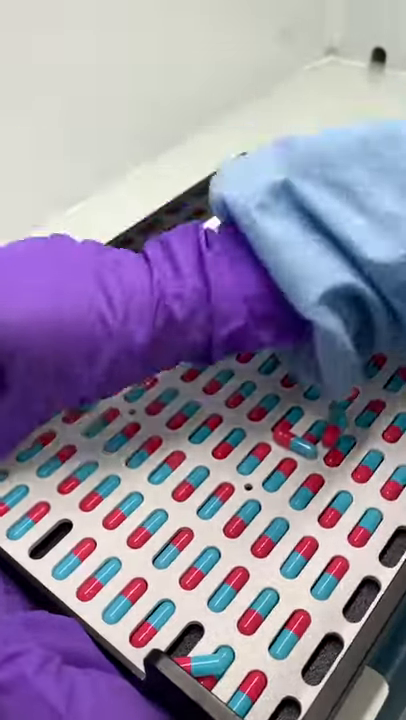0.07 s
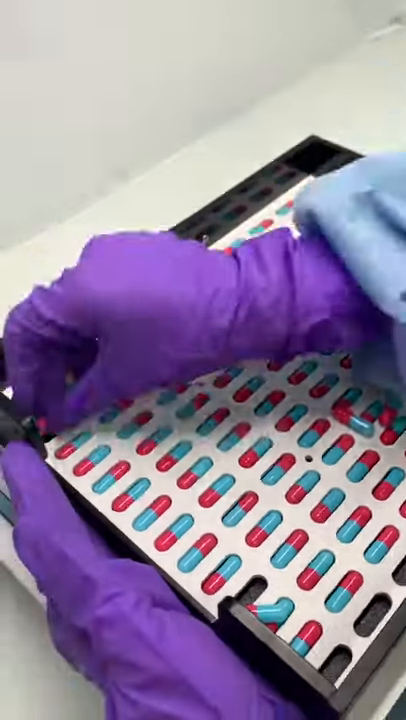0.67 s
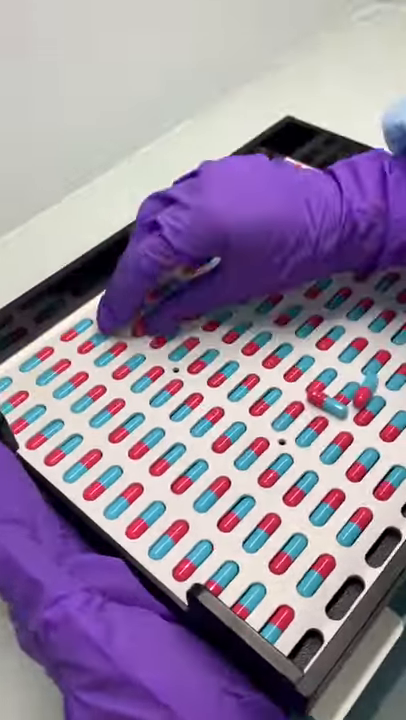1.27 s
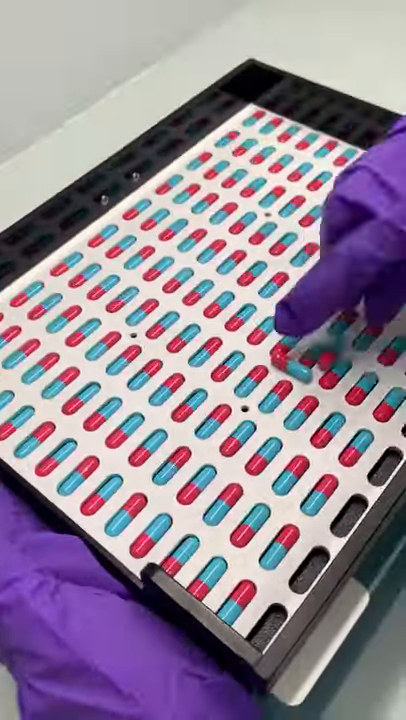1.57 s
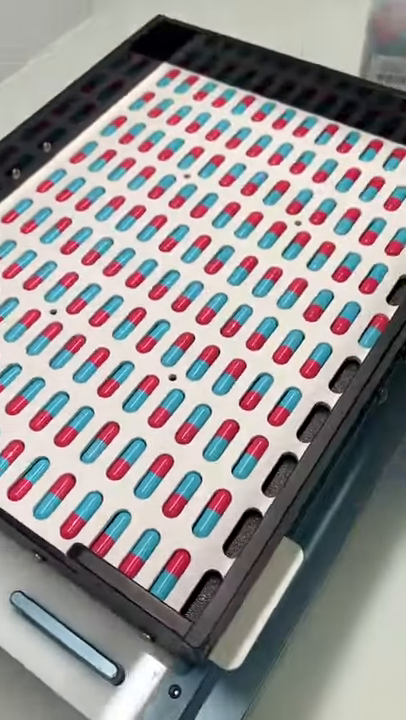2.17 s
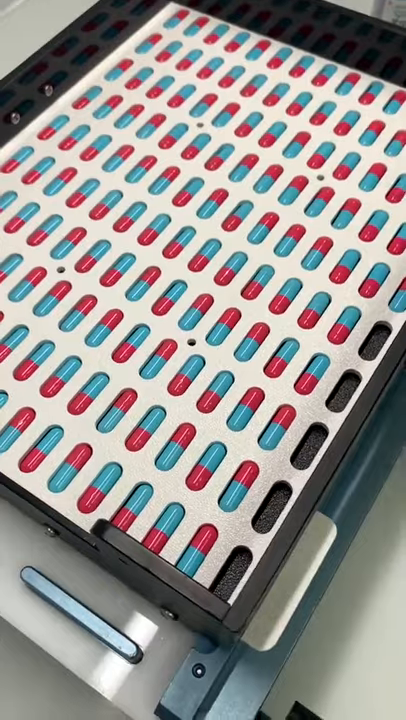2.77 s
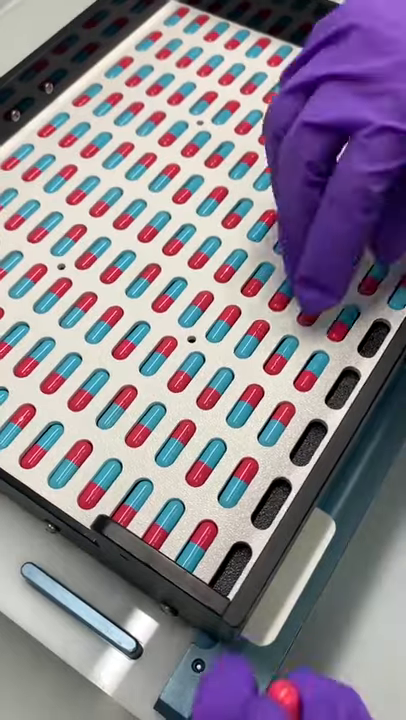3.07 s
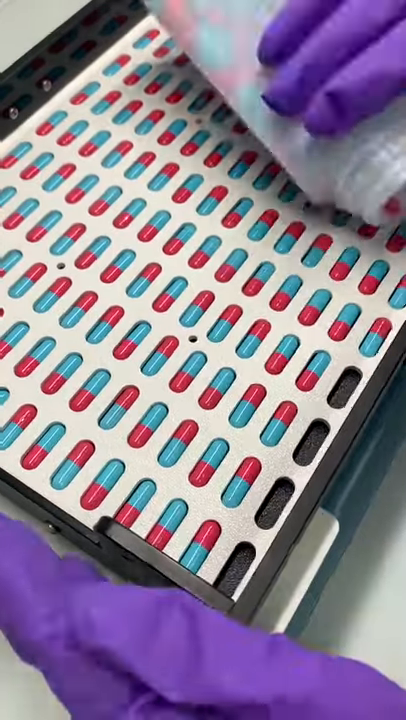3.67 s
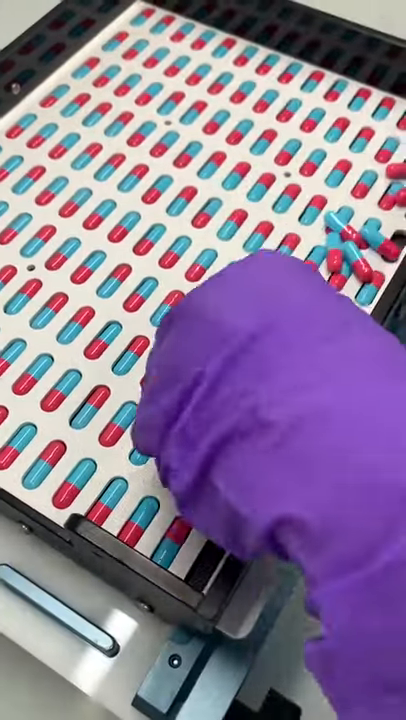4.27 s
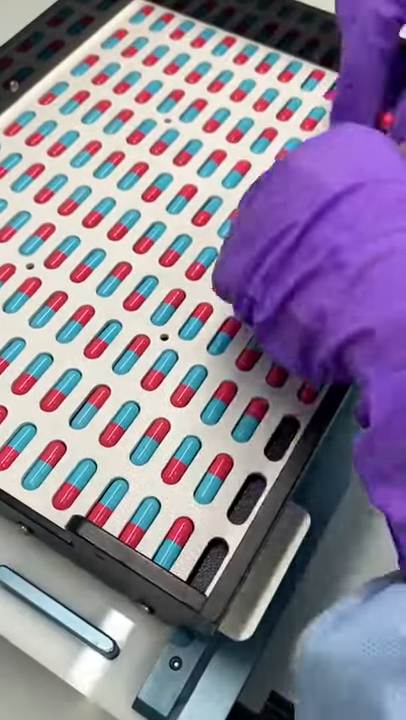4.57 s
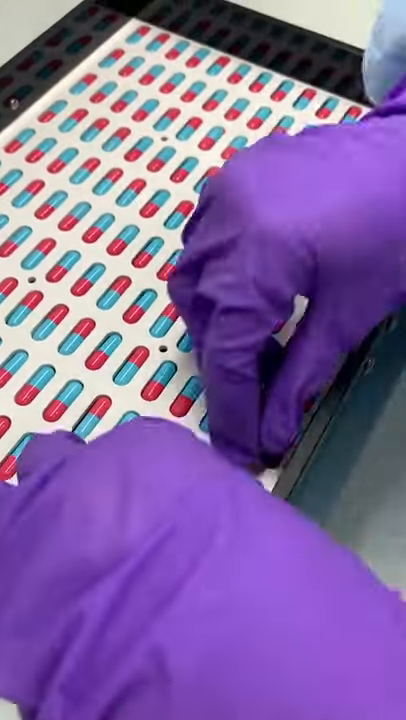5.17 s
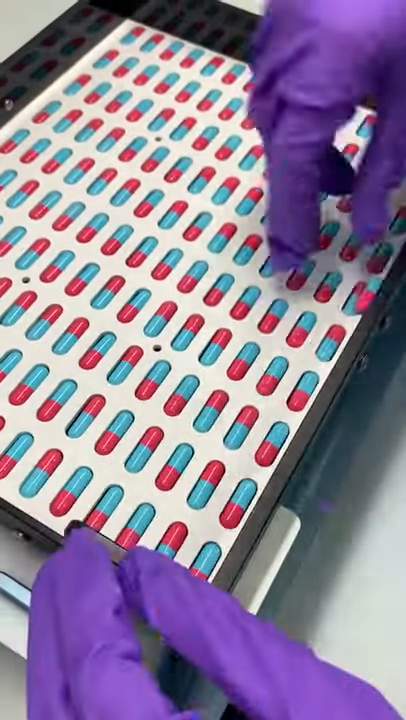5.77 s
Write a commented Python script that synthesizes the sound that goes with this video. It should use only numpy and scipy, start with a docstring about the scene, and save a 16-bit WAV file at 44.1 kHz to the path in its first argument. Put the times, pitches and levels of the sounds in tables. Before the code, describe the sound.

Ventilation hums throughout in a small booth, low and slightly wavering. Close by, gloved hands press hard plastic capsules into a tray: small, irregular clicks inside soft scuffs over the first second and again around 2 seconds. Rubber gloves swish and sleeves rustle faintly in between. The machine's frame gives soft, low thuds near 1 and 2 seconds. After a lull, a few capsules rattle briefly at about 2.8 seconds, followed by more clicks and a thud. From about 3.5 to 4.3 seconds comes the loudest part: a plastic bag crinkles with sharp little cracks as capsules spill in clumps and clatter on the dully ringing tray. Gloves swish at around 4.5 seconds. The pressing then continues, with a busier run of light clicks from 5.2 seconds until the end near 6 seconds, and soft thuds at about 5.3 and 5.7.

```python
"""A capsule-filling booth. Gloved hands press hard plastic capsules into the pockets of a tray:
small clicks inside soft scuffs. Midway more capsules slide out of a crinkling plastic bag and rattle
on the tray, whose plate rings dully. Gloves and sleeves rustle in between, and the machine's frame
thuds under a leaning hand. Behind it all, ventilation air drones in three duct resonances."""
import sys
import numpy as np
from scipy import signal
from scipy.fft import rfft, irfft, next_fast_len
from scipy.io import wavfile
from scipy.ndimage import map_coordinates

SR = 44100
rng = np.random.default_rng(int(sys.argv[2]) if len(sys.argv) > 2 else 0)


def put_to_file(sound):
    """Save the sound as 16-bit audio at rate SR, in the file named by the first command-line argument."""
    columns = np.atleast_2d(sound).T  # one column per channel
    safe = np.clip(columns, -1, 1)
    whole_steps = np.round(safe * 32767)
    wavfile.write(sys.argv[1], SR, whole_steps.astype(np.int16))


N = 261072
TIME_S = np.arange(N) / SR
BURST_S = np.arange(-SR // 10, SR // 5) / SR  # time around one contact

# dull and bright rustle of thin sheets: freq_hz, density_db
DULL_RUSTLE = [(50, 2), (300, 17), (700, 3.5), (1500, 9.5), (2600, 3), (4500, -2), (8000, -7.5),
               (12000, -38), (15500, -45)]
BRIGHT_RUSTLE = [(1000, -10.5), (2500, 5.5), (5000, 1.5), (7500, -0.5), (12000, -4), (15500, -14)]
# balance of close and room sounds: freq_hz, left_minus_right_db
NEAR_PAN = [(500, -2), (1200, -2.5), (2400, -1.1), (4400, 0.3), (15000, -0.15)]
ROOM_PAN = [(60, 2), (130, -2), (220, -3), (310, -6), (420, -1.5), (700, -0.5), (4000, 0)]


def capsule_presses(shell_q=3.6, ripple_db=1.8, cap_hz=7630, cap_width_hz=860, cap_db=-13):
    """Fingers seat capsules: a tick in a scuff, coloured by the damped shell and its small cap."""
    # time_s, click_db, scuff_db, ring_hz, ring_db, tilt_db_per_octave
    presses = [(0.1311, -44, -52.5, 2570, 1, -1), (0.338, -40.5, -59, 1700, 5, 3.5),
               (0.34, -44, -71, 12000, 5, 11), (0.4, -62, -56, 1200, -11, -3.5),
               (0.5395, -38, -49.5, 2760, -15, -1), (0.5472, -51, -57, 2800, -10, -6),
               (0.582, -58, -82, 6370, -1, -6), (0.959, -52, -50.5, 2830, -13, 0),
               (0.967, -56, -47.5, 2560, -4, 2), (0.979, -59, -59, 2800, -8, 1),
               (1.0742, -52, -58, 2600, -17, 1), (1.0803, -47, -51.5, 2600, -17, -1),
               (1.097, -57, -54, 2600, -18, -2), (1.109, -48, -52.5, 2400, -20, -2.5),
               (1.802, -61, -70, 4200, -9, -3), (1.876, -58, -58, 3100, -22, 0),
               (1.9032, -56, -54.5, 3050, -17, -5), (1.945, -65, -61.5, 2800, -3, -6.5),
               (1.998, -44.5, -53.5, 2600, 15, -2), (2.0269, -42.5, -57.5, 4100, -6, -2.5),
               (2.057, -59, -64, 2400, -11, -18), (3.178, -51.5, -55.5, 3000, 1, -12.5),
               (3.286, -45.5, -49.5, 2600, -14, -7.5), (3.399, -59, -53.5, 2280, -10, -1.5),
               (3.447, -53, -56, 4030, -20, -4.5), (4.26, -60, -54, 2930, -4, -2),
               (4.367, -71, -51.5, 4200, -19, -0.5), (4.466, -61, -59, 4200, -13, 0),
               (4.6547, -56, -65, 2430, -16, -3), (4.8597, -54, -52, 5400, -26, 1.5),
               (4.876, -66, -62, 4500, -18, -1), (4.9129, -45.5, -51, 4530, -18, -0.5),
               (5.0889, -68, -54, 3120, -12, -3), (5.1692, -69, -58.5, 4480, -5, -7),
               (5.232, -67, -62.5, 7200, 2, -3.5), (5.261, -51.5, -62, 4650, -17, 3),
               (5.2875, -43, -50.5, 1890, -2, 3), (5.368, -47.5, -53.5, 2580, -20, -1.5),
               (5.416, -47.5, -58, 2780, -5, -4.5), (5.4445, -50, -56, 2760, -14, -3.5),
               (5.4735, -49, -53, 1150, -9, -1.5), (5.497, -61, -64, 2800, -12, -1),
               (5.5201, -65, -53.5, 1150, -7, -1.5), (5.671, -55, -60, 2580, -11, -0.5),
               (5.692, -55, -54.5, 2860, -17, -1), (5.713, -54, -50, 2170, -4, 2),
               (5.744, -39.5, -47.5, 2000, 0, -1), (5.765, -50, -67, 2600, -14, -5.5),
               (5.885, -48, -58, 5160, 3, -2), (5.9039, -50.5, -58.5, 2580, -12, -2)]
    # freq_hz, density_db
    scuff_spectrum = [(80, -23), (300, -2.5), (700, -12.5), (1150, 1.5), (1600, -2.5), (2500, 1),
                      (4000, 0.5), (6000, -1.5), (7700, -2.5), (10000, -6.5), (15500, -14.5)]
    out = np.zeros((2, N))
    envelope = swell(rise_s=0.0076, fade_s=0.01)
    for time_s, click_db, scuff_db, ring_hz, ring_db, slope in presses:
        modes = [(ring_hz, ring_hz / shell_q, ring_db), (cap_hz, cap_width_hz, cap_db)]
        shell = lambda hz: (0.5 + resonances(modes, hz)) * amp(ripple_db * ripple(hz, step_hz=243.6))
        colour = lambda hz: amp(along(scuff_spectrum, hz)) * tilt(slope, hz) * shell(hz)
        press = contact(colour, click_db, scuff_db, envelope, hits_per_s=700, click_s=0.00125)
        add_burst(out, time_s, press)
    return out


def capsule_pour(clatter_db=-4, ripple_db=3.5, knock_octaves=0.44, singles_db=-8):
    """Clumps of capsules clatter on the tray; where they land decides which plate modes ring."""
    # time_s, click_db, rattle_db, knock_db, knock_hz, tilt_db_per_octave, fade_s
    landings = [(2.7485, -49, -47.5, -49, 700, 0.5, 0.0093), (2.8, -50, -49, -71, 700, -2, .009),
                (2.8125, -40, -50, -55, 1080, -.5, 0.026), (2.836, -54, -57, -67, 700, 1, 0.0083),
                (2.8604, -42.5, -55, -56.5, 640, -1.5, 0.026), (3.503, -37.5, -49, -54, 620, -3, 0.021),
                (3.607, -46, -50, -57, 1100, -1.5, .012), (3.621, -42, -43.5, -45, 1170, 0, .02),
                (3.637, -42, -42, -41, 1150, 0, 0.013), (3.644, -27, -54, -42.5, 1140, 4.5, .0085),
                (3.6617, -27, -34, -42.5, 1220, 2, 0.015), (3.67, -40, -44, -42, 1160, 1, 0.01),
                (3.69, -41, -42, -75, 1100, 3, 0.063), (3.7132, -31.5, -40.5, -47, 1580, 1, 0.041),
                (3.7526, -38.5, -50, -63, 705, 6, .015), (3.812, -43, -41, -47.5, 644, 2, 0.056),
                (3.897, -39, -43, -69, 700, 7, 0.011), (3.905, -38, -42.5, -66, 700, 7, 0.087),
                (3.922, -36.5, -42.5, -40, 750, -4.5, 0.027), (3.94, -52, -41, -48.5, 900, -0.5, 0.024),
                (3.972, -43, -43.5, -50.5, 700, 3, 0.049), (4.095, -36.5, -47, -53, 900, -4, 0.018),
                (4.109, -38.5, -40.5, -52, 650, -0.5, 0.026), (4.147, -47, -43, -50.5, 620, -0.5, 0.012),
                (4.201, -42, -54, -56, 630, -3, .006), (4.2066, -37, -50, -45, 645, -4.5, 0.0055),
                (4.2276, -46, -55, -67, 700, -8, 0.0055), (4.3, -52, -52, -59, 590, -1.5, 0.0062)]
    # low and high tray modes: centre_hz, width_hz, gain_db
    plate_modes = [(424, 32, 19.5), (558, 27, 14), (664, 77, 7.5), (707, 44, 10.5), (884, 130, -4.5),
                   (956, 84, -2), (1120, 35, 8), (1216, 60, 6), (1540, 70, 4), (1760, 40, -3)]
    clatter_modes = [(1057, 25, -3), (1260, 23, -18), (1545, 37, -7), (1690, 18, -2), (2710, 200, -1.5),
                     (4240, 610, 0), (5340, 76, -4), (5880, 170, 0)]
    # freq_hz, density_db
    rattle_spectrum = [(60, -10), (250, -4.5), (600, 2.5), (1200, 3), (2000, 3), (3300, -1), (6300, -1.5),
                       (9000, -7), (12000, -9.5), (15500, -20.5)]
    clatter = lambda hz: 1 + amp(clatter_db) * resonances(clatter_modes, hz)
    tray = lambda hz: clatter(hz) * amp(ripple_db * ripple(hz, step_hz=84.34))
    out = np.zeros((2, N))
    for time_s, click_db, rattle_db, knock_db, knock_hz, slope, fade_s in landings:
        colour = lambda hz: amp(along(rattle_spectrum, hz)) * tilt(slope, hz) * tray(hz)
        spot = lambda hz: 1 / (1 + (np.log2((hz + 1) / knock_hz) / knock_octaves) ** 2)
        envelope = swell(rise_s=0.0088, fade_s=fade_s)
        blows = burst_noise() * envelope
        plate = unit(close(blows, lambda hz: resonances(plate_modes, hz) * spot(hz)))
        plate *= amp(knock_db) * np.sqrt(np.mean(envelope ** 2))
        shells = contact(colour, click_db, rattle_db, envelope, hits_per_s=900, click_s=0.0081)
        singles = amp(rattle_db + singles_db) * unit(close(shell_ticks(), colour)) * envelope
        add_burst(out, time_s, shells + plate + singles)
    return out


def contact(colour, click_db, rattle_db, envelope, hits_per_s, click_s, highpass_hz=2400):
    """Tiny collisions peak in one click: a shell buzzes briefly, too small to radiate much bass."""
    hits = grains(len(BURST_S), hits_per_s, scatter_db=1)
    rattle = unit(close(hits, colour)) * envelope
    buzz = np.sign(burst_noise()) * (BURST_S >= 0) * np.exp(-np.abs(BURST_S) / click_s)
    click = point_source(buzz, lambda hz: colour(hz) * 1j * hz / (highpass_hz + 1j * hz))
    click /= np.sqrt(np.sum(click ** 2) / (2 * SR / 1000))  # energy of 1 ms at rms 1
    return amp(click_db) * click + amp(rattle_db) * rattle


def shell_ticks(ticks_per_s=130, decay_s=0.0015):
    """Single loose shells snap at random moments."""
    onsets = rng.random(len(BURST_S)) < ticks_per_s / SR
    envelope = signal.lfilter([1], [1, -np.exp(-1 / (decay_s * SR))], onsets.astype(float))
    return envelope * burst_noise()


def bag_crinkle(crackles_per_s=260, bright_db=-2, flutter_db=3.5, folds_per_s=55):
    """The bag is tipped, emptied and lifted away: dull folds and bright crackles."""
    # time_s, level_db
    levels = [(3.58, -64), (3.64, -77), (3.8, -51.5), (4.03, -47.5), (4.16, -55.5), (4.331, -65)]
    start_s, end_s = levels[0][0], levels[-1][0]
    dull = rustle(DULL_RUSTLE, crackles_per_s, scatter_db=0)
    bright = rustle(BRIGHT_RUSTLE, crackles_per_s, scatter_db=0)
    gain = amp(curve(levels) + flutter_db * wobble(folds_per_s))
    return stroke(start_s, end_s - start_s) * gain * unit(dull + amp(bright_db) * bright)


def bag_creases():
    """Stiff creases flip over with short, very bright cracks."""
    # time_s, level_db
    cracks = [(3.6455, -40), (3.7135, -33), (3.721, -48), (3.753, -46), (3.825, -44), (3.902, -45)]
    # freq_hz, density_db
    crack_spectrum = [(2000, -29), (5000, 1), (8000, -13), (12000, 7), (15500, 8)]
    out = np.zeros((2, N))
    for time_s, level_db in cracks:
        crack = unit(point_source(burst_noise(), lambda hz: amp(along(crack_spectrum, hz))))
        add_burst(out, time_s, amp(level_db) * crack * swell(rise_s=0.00042, fade_s=0.003))
    return out


def gloves_and_sleeves(idle_sleeve_db=-82.5, idle_glove_db=-95, flutter_db=2, catches_per_s=55):
    """Sleeves brush dully and rubber gloves swish brightly; their folds catch and let go."""
    # start_s, length_s, sleeve_db, glove_db
    strokes = [(0.01, 0.078, -76, -72), (0.11, 0.012, -66, -62), (0.142, 0.22, -72.5, -75.5),
               (0.322, 0.021, -67, -61), (0.389, 0.076, -71, -72.5), (0.501, 0.03, -67, -64.5),
               (0.668, 0.03, -72, -62.5), (0.76, 0.021, -74, -70.5), (0.907, 0.087, -69, -90),
               (1.011, 0.015, -67, -67), (1.192, 0.22, -74, -74), (1.318, 0.023, -65.5, -64),
               (1.398, .16, -72, -70.5), (1.642, 0.17, -70, -72), (1.704, 0.019, -69, -63.5),
               (1.95, 0.34, -71, -77.5), (2.13, 0.083, -67, -70), (2.414, 0.19, -74, -76),
               (3.059, 0.061, -74, -73.5), (3.213, 0.202, -70, -66.5), (3.287, 0.052, -62, -60),
               (3.46, 0.036, -70, -68.5), (4.467, 0.05, -59, -53), (4.514, 0.069, -61.5, -56),
               (4.675, 0.033, -71, -72), (4.725, 0.2, -66, -69.5), (4.742, 0.14, -74, -69),
               (4.982, 0.091, -70, -63.5), (5.019, 0.016, -69, -62), (5.06, 0.41, -70.5, -78),
               (5.224, 0.34, -77, -68), (5.53, 0.15, -74, -75.5), (5.833, 0.058, -81, -69)]
    sleeve_power, glove_power = amp(idle_sleeve_db) ** 2, amp(idle_glove_db) ** 2
    for start_s, length_s, sleeve_db, glove_db in strokes:
        motion = stroke(start_s, length_s) ** 2
        sleeve_power += amp(sleeve_db) ** 2 * motion
        glove_power += amp(glove_db) ** 2 * motion
    catching = amp(flutter_db * wobble(catches_per_s))
    sleeve = np.sqrt(sleeve_power) * rustle(DULL_RUSTLE, grains_per_s=2500, scatter_db=3.3)
    glove = np.sqrt(glove_power) * rustle(BRIGHT_RUSTLE, grains_per_s=600, scatter_db=3.5)
    return catching * (sleeve + glove)


def glove_slides():
    """Rubber glides over smooth shells with a thin, high whisper."""
    # start_s, length_s, level_db
    slides = [(0.312, 0.019, -61), (1.403, 0.17, -70), (1.632, .09, -76), (3.474, 0.043, -61)]
    # freq_hz, density_db
    whisper_spectrum = [(2000, -32), (5000, -5), (7500, 2.5), (10000, -7), (13000, 2), (15500, -14)]
    envelope = sum(amp(level_db) * stroke(start_s, length_s) for start_s, length_s, level_db in slides)
    return envelope * rustle(whisper_spectrum, grains_per_s=2300, scatter_db=2)


def frame_thuds(highpass_hz=80.0):
    """The machine's frame thuds softly under a leaning hand."""
    # time_s, level_db, pitch_hz
    thuds = [(0.965, -39, 123), (1.097, -37, 104), (2.048, -34.5, 117), (2.808, -49, 111),
             (3.293, -43.5, 121), (3.665, -36, 111), (3.93, -42, 102), (5.291, -38, 111), (5.699, -38, 126)]
    out = np.zeros((2, N))
    for time_s, level_db, pitch_hz in thuds:
        tone = np.sin(2 * np.pi * (pitch_hz * BURST_S + rng.random()))
        thud = unit(tone * room_balance(pitch_hz)) * swell(rise_s=0.013, fade_s=0.02)
        add_burst(out, time_s, amp(level_db) * thud)
    return filtered(out, lambda hz: hz ** 6 / (hz ** 6 + highpass_hz ** 6))


def wall_reflections(x, t60_s=0.15, delay_s=0.006):
    """The booth's hard walls return a short diffuse tail."""
    t = np.arange(SR // 3) / SR
    tail = rng.standard_normal((2, len(t))) * amp(-60 * t / t60_s) * (t > delay_s)
    return signal.fftconvolve(x, tail / np.linalg.norm(tail[0]), axes=1)[:, :N]


def ventilation(rumble_db=-50.5, hiss_db=-70, skirt_db=-6, drift_hz=3.49, waver_db=1.7):
    """Moving air hums in three duct modes, wavering tones in skirts of noise, over rumble and hiss."""
    # centre_hz, width_hz, trim_db
    duct_modes = [(130.2, 22.4, 1), (218.8, 19.4, 0), (311, 16.5, -1)]
    # hum of each mode before trim: time_s, level_db
    low_hum = [(0.0, -57), (0.38, -47.5), (0.92, -51.5), (0.97, -46), (1.55, -51.5), (1.66, -44.5),
               (1.75, -62), (1.81, -48), (2.08, -43), (2.11, -51.5), (3.18, -47.5), (3.31, -44.5),
               (3.35, -50), (3.63, -48.5), (3.91, -53), (3.94, -44.5), (4.09, -52.5), (5.92, -48.5)]
    mid_hum = [(0.0, -60), (0.06, -39.5), (0.16, -51), (1.25, -46.5), (1.48, -57), (1.5, -47.5),
               (1.99, -53), (2.08, -44), (2.19, -52.5), (3.36, -47), (3.41, -60), (3.51, -46.5),
               (4.09, -54.5), (4.15, -62), (4.3, -47.5), (4.4, -56), (4.68, -46.5), (4.81, -65),
               (4.85, -42.5), (4.9, -54), (5.49, -48.5), (5.56, -60), (5.89, -43.5), (5.92, -65)]
    high_hum = [(0.0, -52), (1.52, -53), (1.65, -62.5), (1.86, -51), (2.41, -60), (2.51, -52.5),
                (2.59, -71), (2.85, -52), (2.93, -72), (3.02, -52.5), (4.71, -51.5), (4.78, -63.5),
                (4.95, -46), (5.44, -51.5), (5.72, -47), (5.79, -69), (5.84, -45.5), (5.92, -58.5)]
    # freq_hz, density_db
    rumble_spectrum = [(20, -64), (45, -19.5), (70, -11.5), (105, 1.5), (135, -4), (160, -20.5), (200, -1),
                       (265, -14.5), (335, -2.5), (365, -16.5), (425, -12.5), (480, -27.5), (700, -34.5),
                       (1200, -65)]
    hiss_spectrum = [(300, -7), (600, -1.5), (1000, -11.5), (2000, -15.5), (5000, -22.5), (10000, -28.5),
                     (15500, -31)]
    out = amp(rumble_db) * room_noise(lambda hz: amp(along(rumble_spectrum, hz)))
    out += amp(hiss_db) * room_noise(lambda hz: amp(along(hiss_spectrum, hz)))
    for (centre_hz, width_hz, trim_db), levels in zip(duct_modes, [low_hum, mid_hum, high_hum]):
        skirt = room_noise(lambda hz: 1 / (1 + ((hz - centre_hz) / width_hz) ** 2))
        pitch_hz = centre_hz + drift_hz * wobble(knots_per_s=14)
        tone = unit(np.sin(2 * np.pi * np.cumsum(pitch_hz) / SR) * room_balance(centre_hz))
        waver = amp(waver_db * wobble(knots_per_s=13))
        out += amp(curve(levels) + trim_db) * unit(waver * (tone + amp(skirt_db) * skirt))
    return out


def room_noise(colour):
    """Diffuse noise, rms 1."""
    # freq_hz, left_right_coherence
    coherence = [(40, 0.99), (120, 0.92), (300, 0.87), (700, 0.3), (2000, 0.04), (12000, 0.05)]
    return unit(spread(rng.standard_normal((2, N)), colour, coherence, ROOM_PAN))


def room_balance(hz):
    """Left and right gains of a tone in the room."""
    return amp(along(ROOM_PAN, hz) * np.array([[0.5], [-0.5]]))


def close(pair, colour):
    """Stereo image of a nearby sound."""
    # freq_hz, left_right_coherence
    coherence = [(300, 0.77), (700, 0.87), (1400, 0.62), (3000, 0.36), (7000, 0.46), (15000, 0.2)]
    return spread(pair, colour, coherence, NEAR_PAN)


def point_source(pair, colour):
    """A snap from one spot reaches left and right almost alike."""
    # freq_hz, left_right_coherence
    coherence = [(300, .97), (2000, .93), (7000, .95), (15000, .85)]
    return spread(pair, colour, coherence, NEAR_PAN)


def spread(pair, colour, coherence, pan):
    """Two unrelated signals become coloured stereo of given coherence and balance."""
    angle = lambda hz: np.arccos(np.clip(along(coherence, hz), -1, 1)) / 2
    mid, side = filtered(pair, lambda hz: colour(hz) * np.array([np.cos(angle(hz)), np.sin(angle(hz))]))
    balance = lambda hz: amp(np.outer([0.5, -0.5], along(pan, hz)))
    return filtered(np.array([mid + side, mid - side]), balance)


def rustle(spectrum, grains_per_s, scatter_db):
    """A thin sheet close by rustles in fine grains, rms 1."""
    return unit(close(grains(N, grains_per_s, scatter_db), lambda hz: amp(along(spectrum, hz))))


def grains(size, hits_per_s, scatter_db):
    """Two streams of tiny contacts over equally strong sliding noise, rms 1."""
    hits = (rng.random((2, size)) < hits_per_s / SR) * np.sign(rng.standard_normal((2, size)))
    hits *= amp(scatter_db * np.clip(rng.standard_normal((2, size)), -2, 2))
    return unit(unit(hits) + rng.standard_normal((2, size)))


def resonances(modes, hz):
    """Causal response of summed modes."""
    return sum(amp(db) * 1j * hz * width_hz / (centre_hz ** 2 - hz ** 2 + 1j * hz * width_hz)
               for centre_hz, width_hz, db in modes)


def ripple(hz, step_hz):
    """Random peaks and dips: each point of contact excites the plastic differently."""
    return map_coordinates(rng.standard_normal(400), [hz / step_hz], mode="nearest")


def tilt(db_per_octave, hz):
    """Spectral slope: harder contacts are brighter."""
    return amp(db_per_octave * np.log2(np.clip(hz, 1600, 14000) / 4000))


def swell(rise_s, fade_s):
    """Envelope peaking at the moment of contact."""
    return np.exp(-np.abs(BURST_S) / np.where(BURST_S < 0, rise_s, fade_s))


def stroke(start_s, length_s, attack_s=0.005, release_s=0.011):
    """Envelope of a hand movement: attack, hold, release."""
    early_s = np.maximum(start_s - TIME_S, 0)
    late_s = np.maximum(TIME_S - start_s - length_s, 0)
    return np.exp(-early_s / attack_s - late_s / release_s)


def wobble(knots_per_s):
    """Smooth random curve."""
    return map_coordinates(rng.standard_normal(1000), [TIME_S * knots_per_s], mode="wrap")


def burst_noise():
    """Two white noises, one burst long."""
    return rng.standard_normal((2, len(BURST_S)))


def add_burst(track, time_s, burst):
    """Mix in a burst with its contact at time_s."""
    start = round((time_s + BURST_S[0]) * SR)
    first, end = max(start, 0), min(start + burst.shape[-1], N)
    track[:, first:end] += burst[:, first - start:end - start]


def filtered(x, response):
    """Apply a frequency response."""
    size = x.shape[-1]
    padded = next_fast_len(size + size // 2)
    return irfft(rfft(x, padded) * response(np.fft.rfftfreq(padded, 1 / SR)), padded)[..., :size]


def along(points, hz):
    """Interpolate (freq_hz, value) points on a log axis."""
    freq_hz, values = np.transpose(points)
    return np.interp(np.log(hz + 1), np.log(freq_hz + 1), values)


def curve(points):
    """Interpolate (time_s, value) points per sample."""
    return np.interp(TIME_S, *np.transpose(points))


def amp(db):
    """Decibels to gain."""
    return 10 ** (np.asarray(db) / 20)


def unit(x):
    """Scale to rms 1."""
    return x / np.sqrt(np.mean(x ** 2) + 1e-20)


def scene(wall_db=-11):
    """Capsules, bag and hands close by, ventilation all around."""
    near = capsule_presses() + capsule_pour()
    near += bag_crinkle() + bag_creases()
    near += gloves_and_sleeves() + glove_slides()
    return near + amp(wall_db) * wall_reflections(near) + frame_thuds() + ventilation()


def record(dry, cutoff_hz=15850):
    """Brick-wall low-pass."""
    return filtered(dry, lambda hz: hz < cutoff_hz)


dry = scene()
out = record(dry)
put_to_file(out)
```